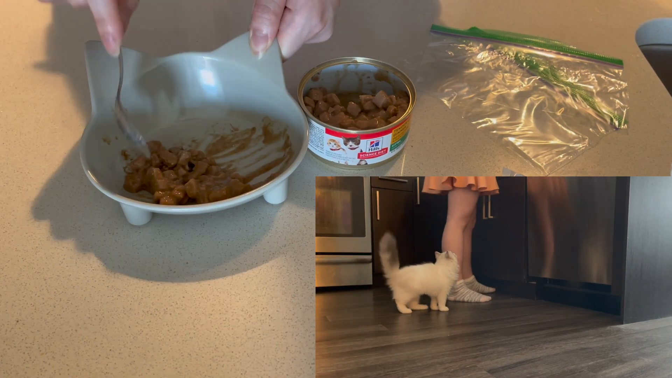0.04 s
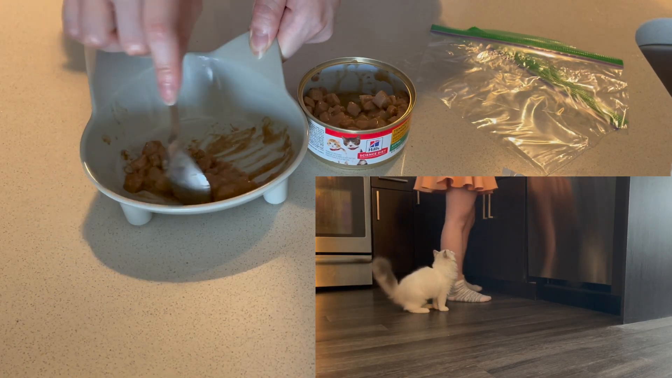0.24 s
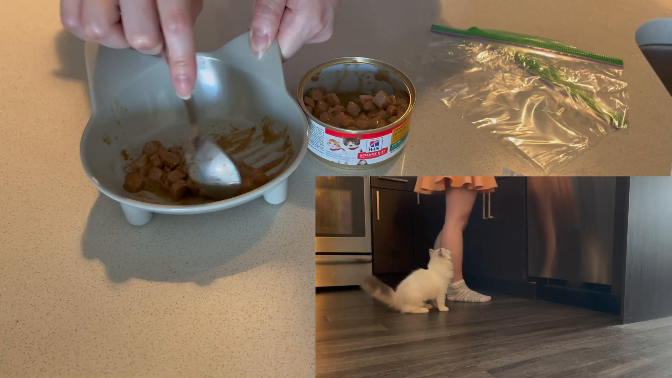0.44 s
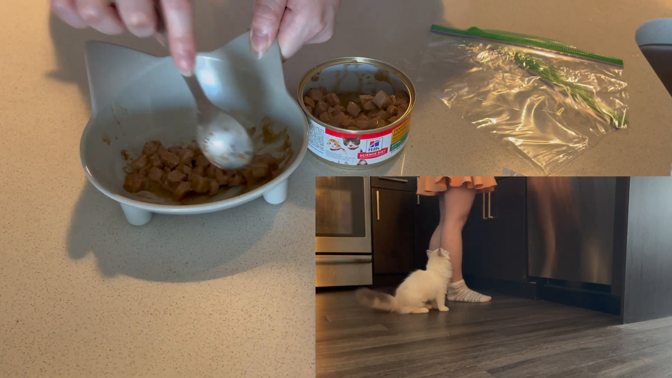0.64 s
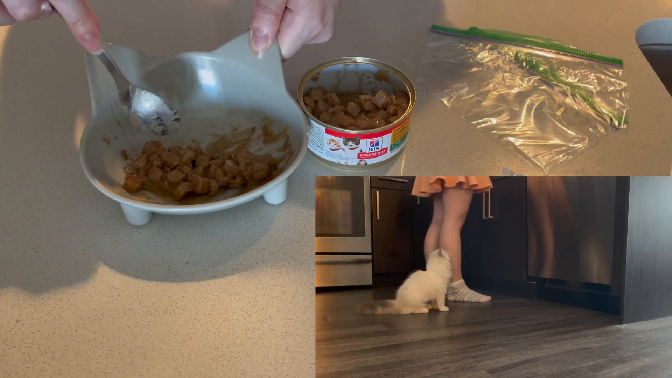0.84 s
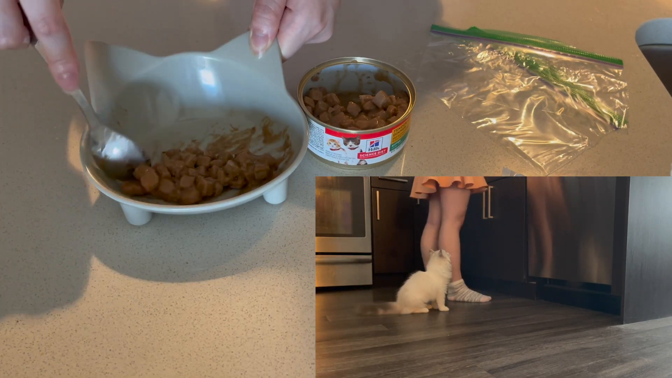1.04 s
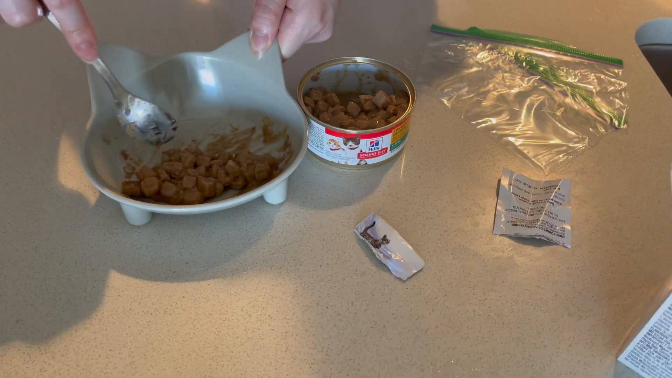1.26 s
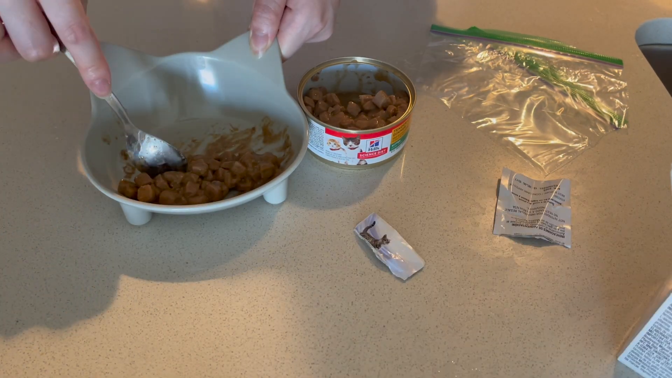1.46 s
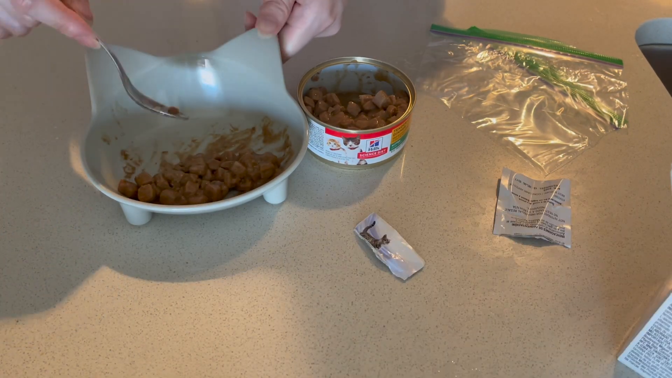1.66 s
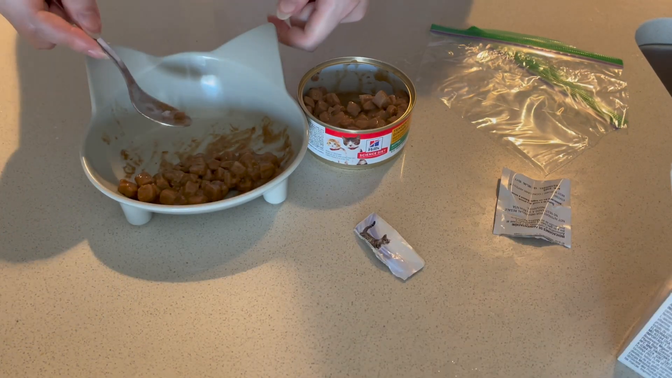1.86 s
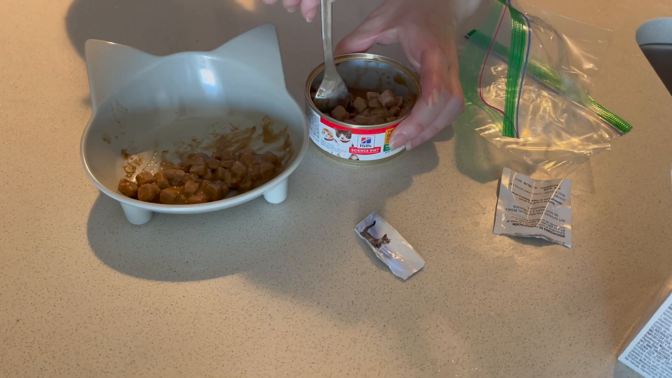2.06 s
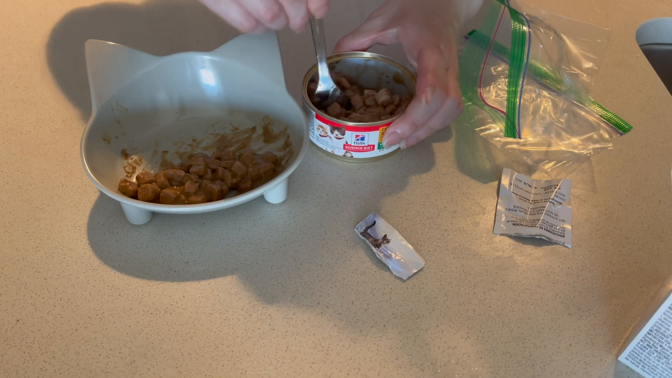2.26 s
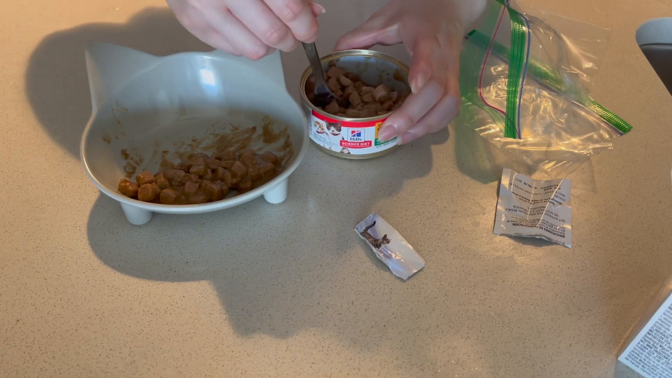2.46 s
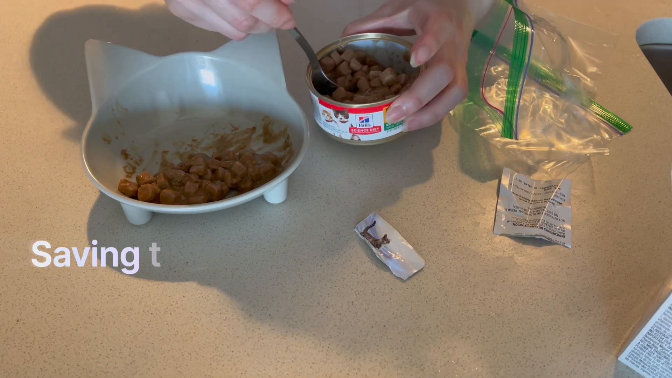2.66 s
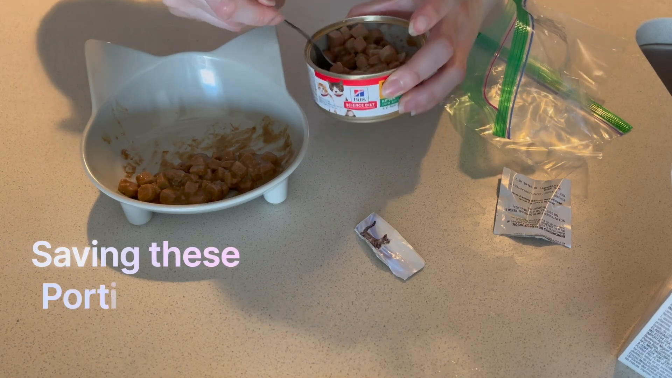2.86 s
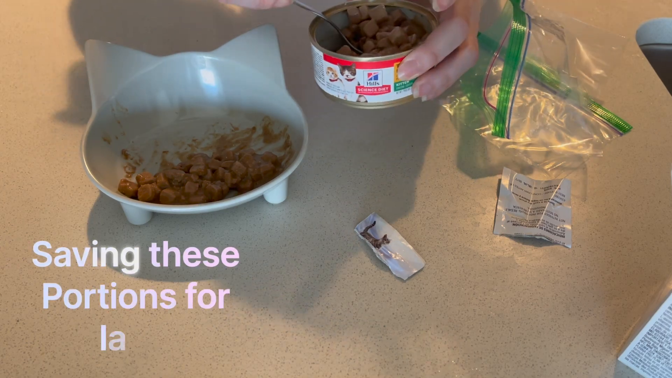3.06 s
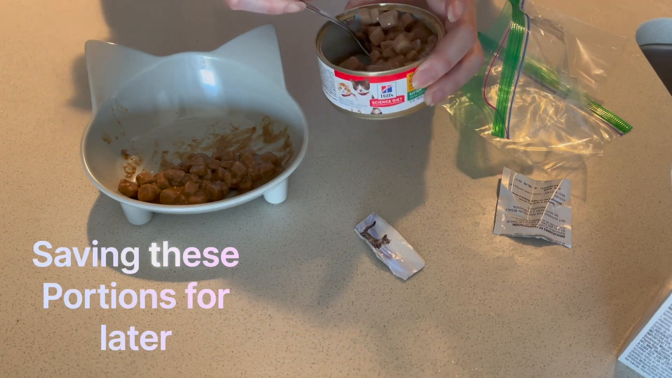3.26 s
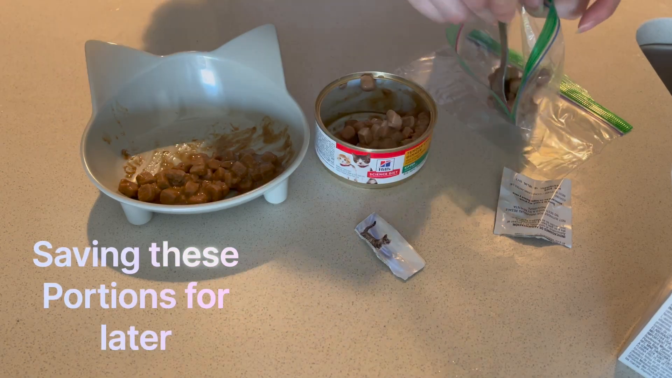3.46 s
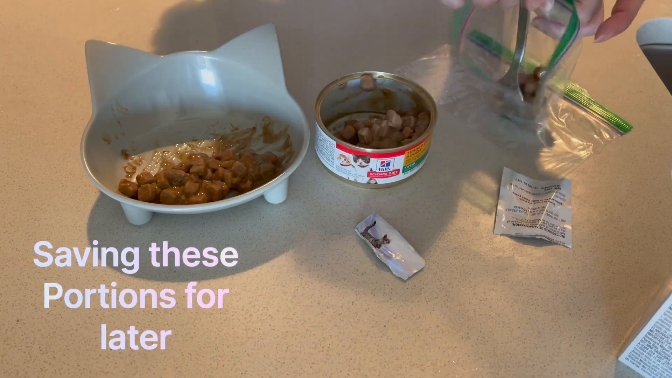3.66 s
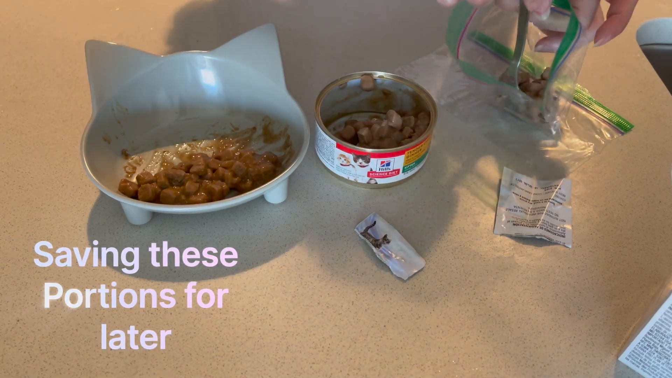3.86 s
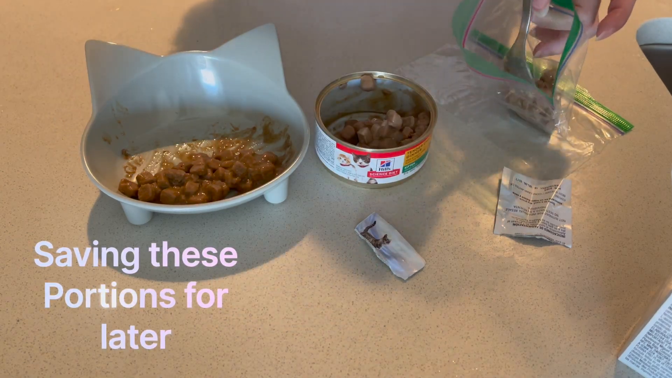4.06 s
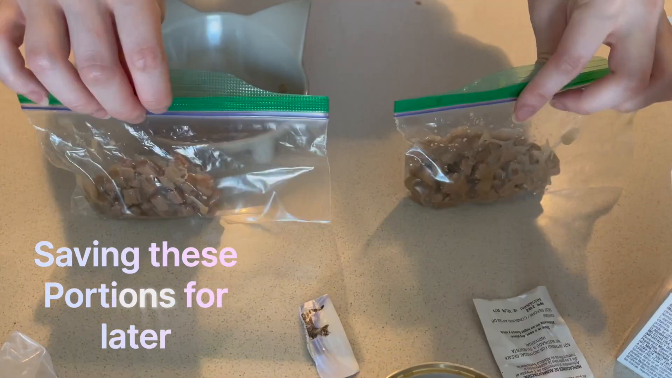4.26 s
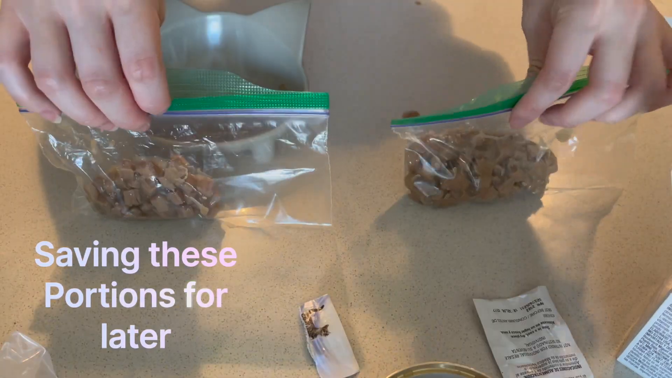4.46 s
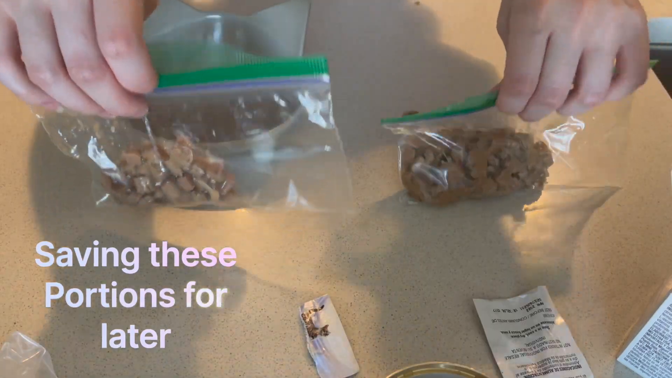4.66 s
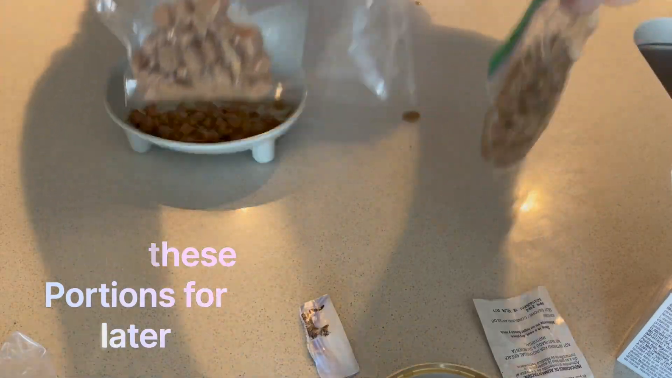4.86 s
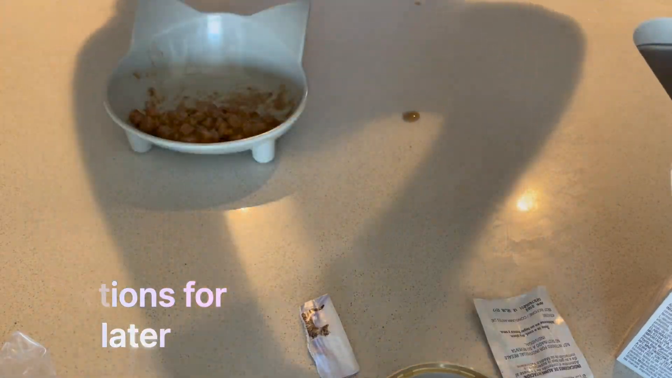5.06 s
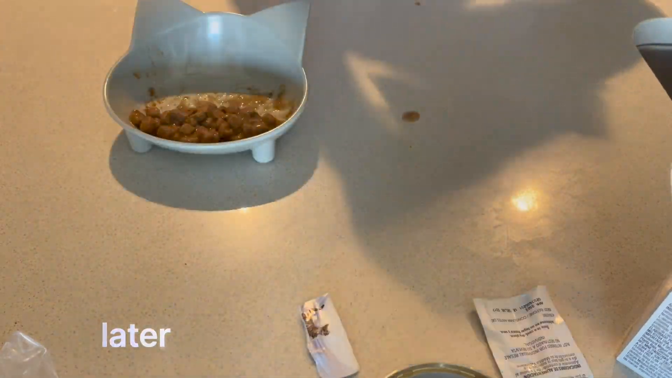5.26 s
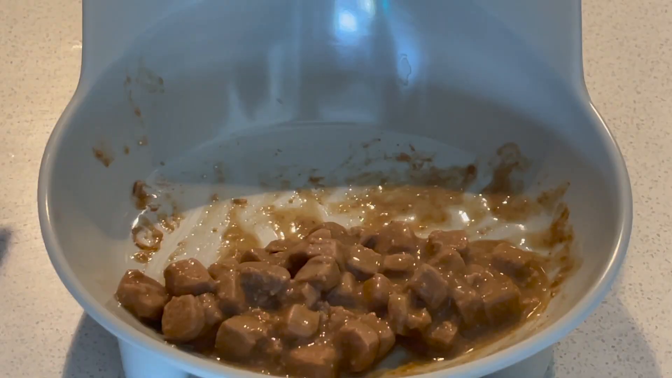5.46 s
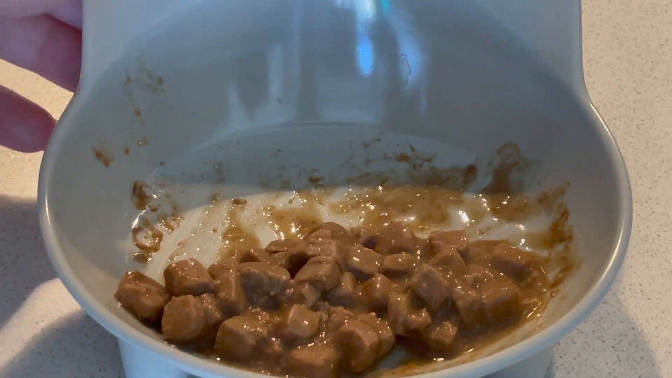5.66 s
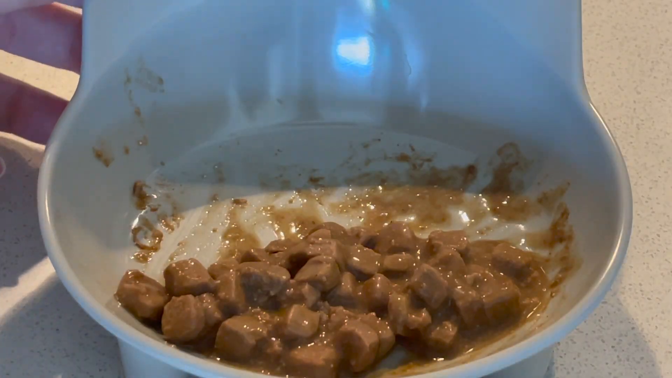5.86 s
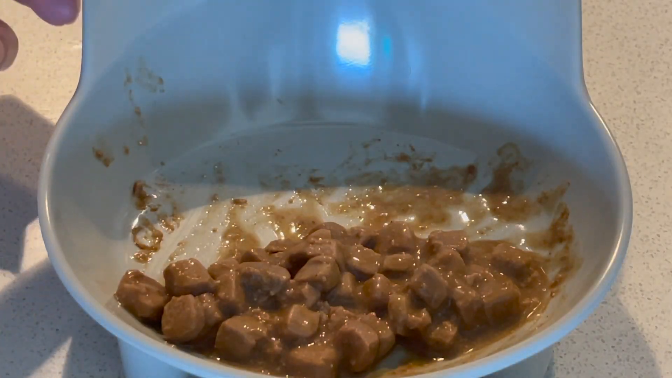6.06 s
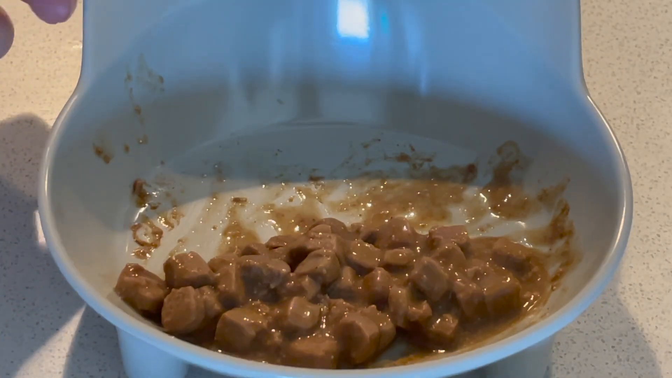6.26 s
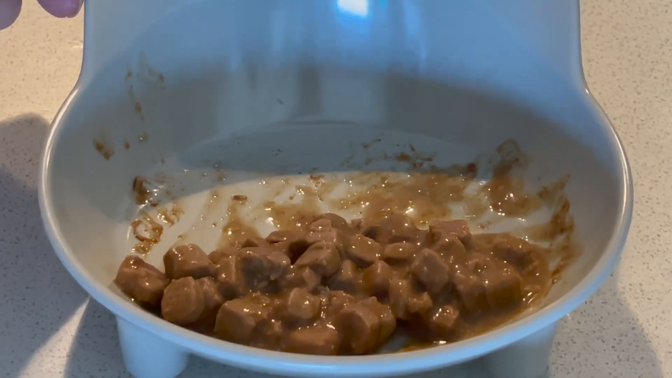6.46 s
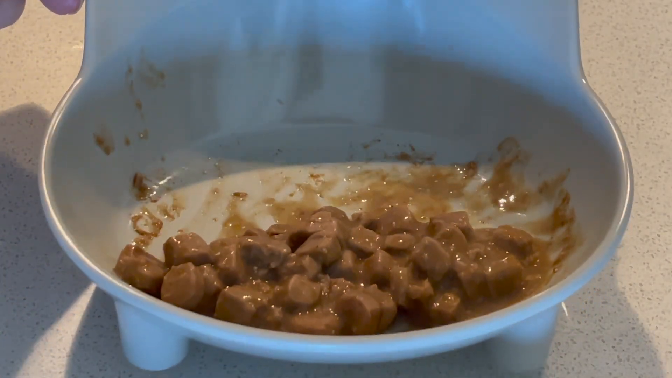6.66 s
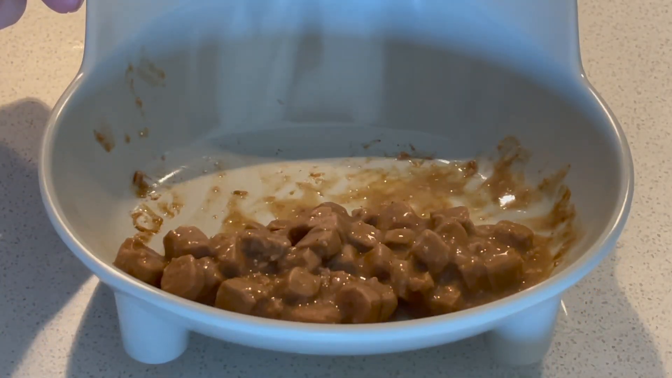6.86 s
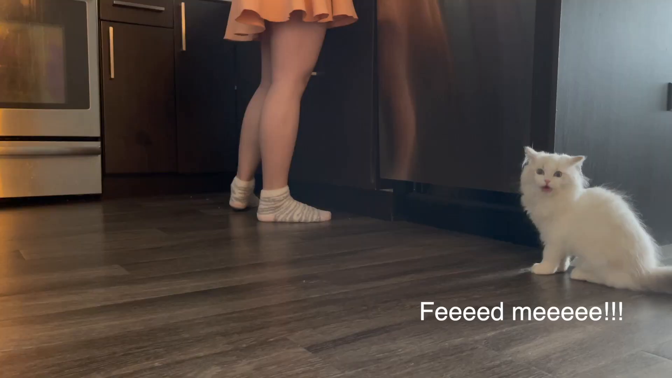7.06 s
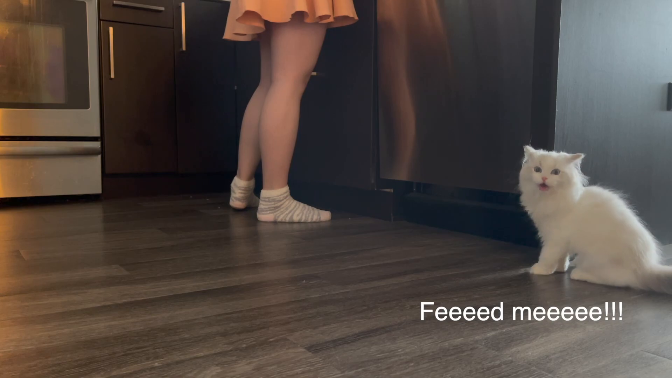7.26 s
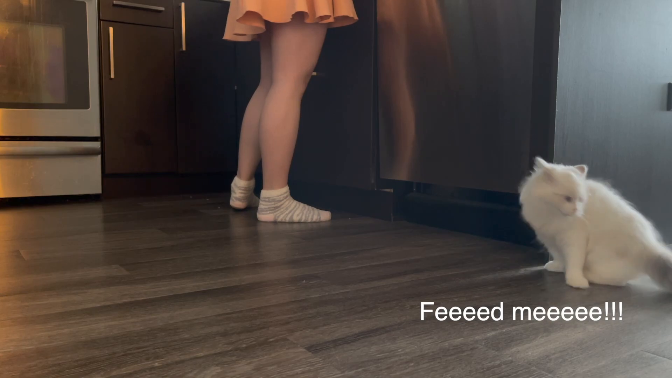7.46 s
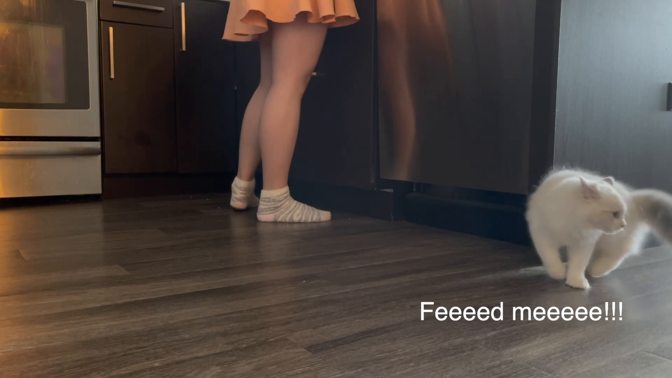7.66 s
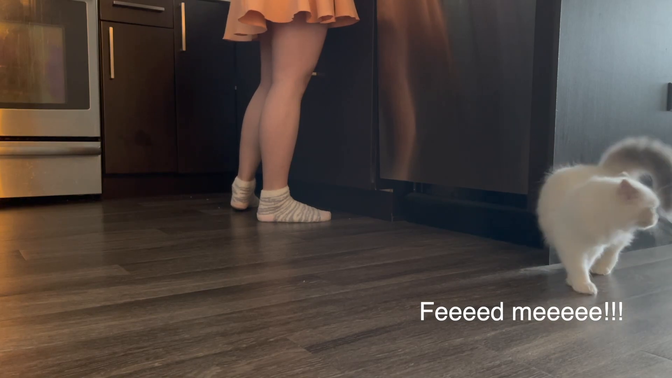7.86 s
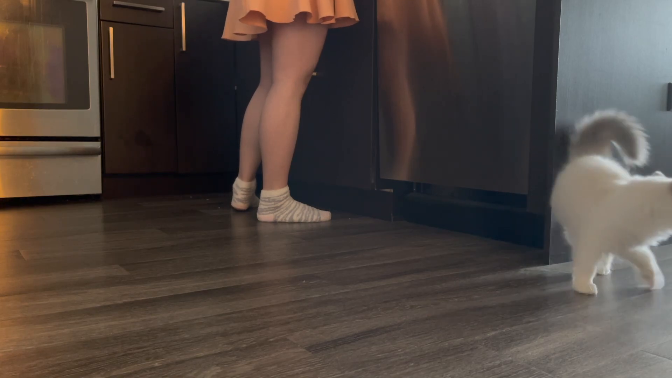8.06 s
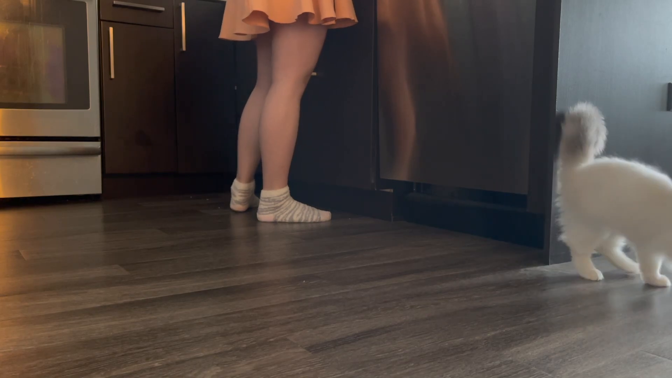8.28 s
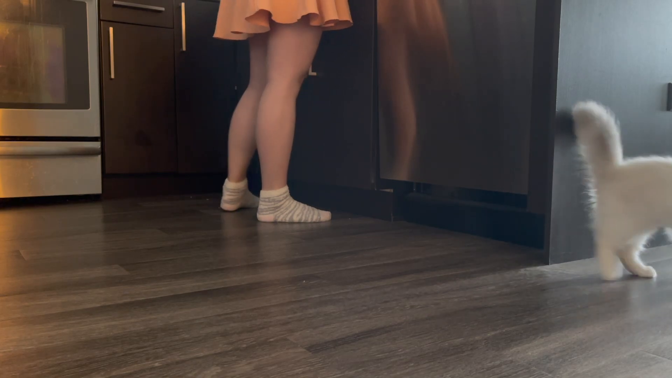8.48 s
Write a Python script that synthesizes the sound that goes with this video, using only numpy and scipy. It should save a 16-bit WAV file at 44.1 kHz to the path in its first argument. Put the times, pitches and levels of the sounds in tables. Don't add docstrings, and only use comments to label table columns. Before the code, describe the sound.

Spoon taps on a bowl, high kitten cries, then crackling plastic handled through three more meows, over a soft steady appliance fan.

```python
import sys
import numpy as np
from scipy import signal
from scipy.fft import rfft, irfft
from scipy.io import wavfile
from scipy.ndimage import uniform_filter1d, minimum_filter1d

SR = 44100
rng = np.random.default_rng(int(sys.argv[2]) if len(sys.argv) > 2 else 0)


def put_to_file(sound):
    columns = np.atleast_2d(sound).T
    safe = np.clip(columns, -1, 1)
    whole_steps = np.round(safe * 32767)
    wavfile.write(sys.argv[1], SR, whole_steps.astype(np.int16))


def boost_factor(decibels):
    exponent = np.asarray(decibels, float) / 20
    return 10 ** exponent


N = 375732

# frequency in Hz, level in dB per Hz.
FAN_AIR = [(15, -68), (34, -42), (52, -21), (120, -15.5), (170, -12), (202, 3.5), (250, -3), (320, -4),
           (650, -11), (800, -7.5), (1190, -20.5), (1560, -25), (2500, -43.5), (4500, -46), (7000, -39.5),
           (16000, -36)]
# frequency in Hz, width in Hz, level in dB.
MOTOR_LINES = [(43.5, 4.7, -59), (87, 5.6, -59.5), (187.4, 31, -49.5), (583, 5.2, -50), (1187, 9.7, -56)]
# frequency in Hz, time to fall 60 dB in seconds.
KITCHEN_DECAY = [(250, 0.33), (1000, 0.19), (2500, 0.49), (5000, 0.41), (9000, 0.33), (14000, 0.039)]

# frequency in Hz, level in dB per Hz.
FILM_COLOUR = [(1800, -2), (3000, 2), (4500, -1), (6700, -2.5), (8500, 0), (10000, -1.5), (11000, 7.5),
               (13000, -24), (16000, 0.5)]
# frequency in Hz, level in dB per Hz.
SCUFF_COLOUR = [(500, -52), (1000, 2), (1600, 1.5), (2500, 1), (3500, -8.5), (5000, -61), (7000, -50)]
# peak in seconds, rise in seconds, fall in seconds, film peak in dB, scuff relative to film in
# dB.
STROKES = [(0.01, 0.12, 1.2, -41, -15), (.2, 0.46, 1.6, -39.5, -8.5), (.942, 0.01, 0.29, -27, -13),
           (2.215, 0.1, 0.55, -40, -2.5), (2.95, 1.1, 0.65, -37, -3), (3.13, .03, 0.62, -43.5, -22),
           (3.262, .03, 0.18, -37.5, -9.5), (3.384, 0.044, 0.5, -38.5, -20), (3.54, 0.15, 0.16, -35, -13),
           (3.64, 0.041, 0.38, -33.5, -11), (3.75, .15, 0.087, -56, -15), (3.96, 0.032, 1.3, -43, -12),
           (4.1, 0.067, 0.67, -44, -8), (4.28, .2, .4, -59, -15), (4.44, 0.44, 0.15, -48.5, 7),
           (4.62, 0.87, 0.45, -28, -7), (4.85, 0.13, 0.53, -30.5, -15), (5.085, 0.047, 0.25, -25.5, -7),
           (5.14, 0.075, 0.18, -24.5, -6), (5.187, 0.062, 0.31, -27.5, -9), (5.408, 0.073, 0.48, -46.5, 11),
           (5.601, 0.16, 0.53, -32, -32), (5.743, 0.16, 0.15, -26, -6), (6.17, 0.62, 0.3, -30.5, -7.5),
           (6.55, 1.6, 0.42, -34, -8.5), (7.025, .015, .4, -50, 2), (6.797, 1.8, 0.13, -32.5, -12),
           (7.098, 0.11, 0.3, -28, 0), (7.33, 0.076, 0.48, -19.5, -10.5), (7.78, 1, 0.4, -39.5, -2.5),
           (7.965, 0.22, 0.28, -32.5, -3.5), (8.5, 6, 0.44, -48.5, -16)]
# start in seconds, peak in dB, centre in Hz, length in seconds.
SNAPS = [(1.95, -32, 8750, 0.024), (2.202, -24, 2900, 0.07), (3, -16, 10800, 0.033),
         (3.115, -9, 10300, 0.048), (3.26, -28, 8230, 0.036), (3.369, -17, 11500, 0.09),
         (3.636, -18, 8850, 0.025), (3.744, -25, 11400, 0.031), (3.949, -28, 3370, 0.11),
         (4.096, -22, 7800, 0.038), (4.349, -19, 6750, 0.082), (4.6, -9.5, 11200, 0.095),
         (4.813, -18, 11200, 0.034), (5.083, -17, 8200, 0.012), (5.135, -10, 8850, 0.04),
         (5.175, -10, 8200, 0.027), (5.079, -21, 2505, 0.03), (5.706, -23, 2600, 0.086),
         (7.913, -21, 8900, 0.037), (5.392, -20, 2930, 0.093), (5.599, -12, 9500, 0.028),
         (5.724, -10.5, 11800, 0.053), (5.948, -17, 10900, 0.012), (6.111, -9, 10400, 0.091),
         (6.343, -11, 12100, 0.034), (6.517, -9, 11600, 0.047), (6.596, -15, 10800, 0.07),
         (6.764, -23, 3430, 0.032), (7.016, -30, 11010, 0.021), (7.399, -10, 8720, 0.023),
         (7.406, -3.5, 11600, 0.046), (7.55, -15, 11000, 0.026), (7.763, -14, 10100, 0.033),
         (7.951, -21, 3200, 0.026)]
# start in seconds, peak in dB, centre in
# Hz.
TICKS = [(3.1149, -21, 9000), (3.2596, -28, 7500), (3.3718, -25, 9000), (3.385, -21, 11000),
         (3.478, -26, 9500), (3.4946, -28, 9500), (3.5699, -27, 10000), (3.5993, -29, 3900),
         (3.6327, -23, 4500), (3.754, -28, 11000), (3.7954, -25, 11500), (3.8303, -36, 10000),
         (3.8507, -36, 8000), (5.3972, -25, 3000), (5.5639, -29, 10000), (5.5988, -22, 7000),
         (5.946, -30, 10000), (2.13, -40, 3000), (3.935, -38, 9000), (3.975, -36, 11500),
         (3.984, -35, 11500), (4.0738, -32, 9000), (4.079, -32, 11500), (4.184, -36, 11500),
         (4.278, -37, 6000), (4.355, -28, 6500), (4.8176, -28, 3000), (4.8491, -27, 8600),
         (5.3823, -34, 2500), (5.8842, -33, 4000), (5.9316, -34, 7200), (7.0126, -38, 6000),
         (7.7679, -28, 9000), (7.8492, -33, 4000), (7.952, -29, 4000), (4.357, -28, 1500),
         (4.422, -31, 1500), (4.55, -29, 1500), (4.7, -31, 1600), (4.82, -29, 1500), (4.97, -33, 2500),
         (4.491, -29, 4000), (6.12, -27, 2000), (6.347, -28, 2500), (6.522, -28, 2300), (3.46, -33, 7000),
         (3.745, -31, 5000), (3.805, -33, 6000),
         (2.8363, -37, 4516), (2.92, -31, 5000), (3.0039, -28, 6000), (3.1205, -29, 8600),
          (3.1235, -28, 9600), (3.2655, -39, 7500), (3.4649, -37, 9000), (4.6076, -27, 7000),
          (5.0616, -30, 2500), (5.0786, -30, 5000), (5.0865, -26, 8000), (5.1339, -18, 4500),
          (5.1425, -25, 7000), (5.1803, -26, 7000), (5.1865, -20, 4500), (5.4487, -36, 2500),
          (5.5201, -35, 2500), (5.5699, -28, 11300), (5.626, -28, 8000), (5.6907, -29, 3000),
          (5.7191, -23, 3000), (5.742, -26, 5000), (6.5946, -27, 7000), (6.7323, -43, 6990),
          (7.3875, -16, 10900), (7.4195, -22, 11000), (7.5507, -32, 8500), (7.585, -33, 7000)]

# start in seconds, peak in dB, brightness in dB, main ring in Hz, contact in seconds.
CLINKS = [(0.1762, -8, 17.5, 1490, 0.0037), (0.486, -9, 15.5, 1485, 0.0038), (.935, 0.5, 26, 5800, 0.0061),
          (1.0641, -12, 18.5, 2700, 0.0049), (1.2301, -4, -4, 1880, 0.0071),
          (1.236, -9.5, -14, 2670, 0.0081), (2.75, -12.5, 36, 6260, 0.0026),
          (3.6865, -12, 19.5, 3260, 0.0062), (3.6885, -23, -25, 780, 0.0031),
          (5.222, -28.5, -28, 546, 0.016), (6.733, -22.5, -27, 665, 0.011), (7.075, -19, -4, 1870, 0.0076),
          (7.3074, -3.5, 36, 5500, 0.0067), (7.3124, -0.5, 19.5, 2570, 0.01), (7.313, -26, -29, 360, 0.004),
          (7.313, -10.5, -10, 3720, 0.016), (1.258, -23, -28, 1500, 0.011), (7.451, -11, 9, 1170, 0.0061)]
# frequency in Hz, width in Hz, level in dB.
BOWL_RINGS = [(1720, 60, 2), (2110, 200, -4), (2400, 200, -5), (2760, 220, -2), (3100, 300, -9),
              (4730, 250, -11), (5950, 300, -15)]

# time in seconds, pitch in Hz, effort in dB,
# chest tone relative in dB, open-mouth ring relative in dB.
MEOWS = [
    [(0.215, 895, -50, 0, -9), (0.24, 885, -36.5, 0, 8), (0.335, 871, -35, -9.5, 8.5),
     (0.493, 857, -32.5, -7.5, 7), (0.68, 860, -30, -11, -5), (0.77, 865, -33, -8, -4),
     (0.853, 849, -36, 4, -11), (0.945, 840, -43, 17.5, -18)],
    [(2.2, 906, -43.5, -5, 5.5), (2.288, 872, -37, 0, 4), (2.4, 896, -34, -6.5, 8.5),
     (2.49, 905.6, -35, -4.5, 0.5), (2.61, 894.4, -28, -14, -10), (2.768, 897, -29.5, -5.5, -11.5),
     (2.87, 875, -32, 5, -17), (3.0, 798, -53, 16, 2)],
    [(4.35, 930, -39.5, -9, 2), (4.406, 880.6, -34.5, -2, 6.5), (4.502, 865.7, -31, -6, 3.5),
     (4.69, 888.3, -30, -4.5, -7.5), (4.84, 861, -32, -2.5, -31), (4.95, 840, -45, 10.5, -13),
     (5.062, 809, -39, 13, -19), (5.24, 776, -50, 3, -21)],
    [(6.025, 908, -38, 2, -3), (6.065, 904, -31, -0.5, -1), (6.201, 893.4, -25.5, -2.5, -10.5),
     (6.289, 876, -38.5, 4, 4), (6.4, 873.4, -41.5, 5.5, 3.5), (6.53, 864.5, -38, 8, 0.5),
     (6.657, 844.4, -40, 11.5, -19), (6.742, 810.6, -38, 9, -18)],
    [(7.062, 931, -33, 0, 4), (7.11, 849, -35.5, 5, 6.5), (7.19, 830, -32.5, -0.5, 11),
     (7.28, 854, -34.5, 3, 5), (7.35, 835, -33.5, 0, 0), (7.43, 852, -35.5, 2.5, -5),
     (7.505, 877.5, -41, 9.5, -12), (7.64, 866, -51.5, 14, -22)],
]
# time in seconds, pitch in Hz, effort in dB, chest tone relative in dB, open-mouth ring relative in dB.
SQUEAKS = [
    [(2.175, 958, -59, 8.4, 13), (2.205, 982, -51, 11, 12), (2.232, 1000, -56, 23, -4)],
    [(4.305, 1020, -53.5, -6, -9), (4.34, 1026, -42, 2, 1), (4.362, 1125, -38, 3, -10)],
    [(5.975, 1030, -46, 4.5, -7), (6.015, 1040, -41, 5.4, -3), (6.045, 1080, -57, 10, 5)],
    [(7.046, 1076, -60, 14, 0), (7.07, 970, -34, 9.8, 0)],
    [(.9, 818, -47, 21, -16), (.935, 805, -58, 16, -20)],
    [(2.935, 833.3, -36, 16.7, -20), (2.98, 820, -55, 13, -20)],
    [(5.195, 816, -42, 24, -20), (5.232, 830, -65, 9.6, -20)],
    [(6.69, 811, -37.5, 9.6, -20), (6.728, 793, -47, 15, -20)],
    [(.195, 958, -51, 7.2, -1), (.225, 880, -45, 7.3, 1)],
]
# sharpness of the nasal resonances in dB,
# 4th partial against the 3rd in dB, 5th likewise in dB, nasal whistle in dB, whistle peak as 0-1 of the call.
VOICES = [(4, -33, -26, -53.5, 0.52), (6.5, -21, -26.5, -51.5, 0.55), (9, -23.5, -34, -57, 0.54),
          (8, -21.5, -33, -62, 0.4), (6, -21.5, -26.5, -56, 0.03), (-2, -29, -27, -64.5, 0.7),
          (-12, -30, -16, -69, 0.8), (-7, -30, -26, -62.5, 0.45),
          (-11, -12, -26, -68, 0.0)] + 5 * [(-2, -18, -25, -76, .5)]
# frequency in Hz, level in dB.
HEAD_COLOUR = [(3400, -10), (4400, -0.5), (5300, 1), (6200, -2), (7100, 4.5), (8000, 13), (8800, 5),
               (9600, 4), (11500, 3), (13000, -17)]
# frequency in Hz, half width in Hz.
NOSE = [
    (8900, 430),
    (11350, 150),
]
# time in seconds, number of the partial, half length in seconds.
DROPOUTS = [(.72, 1, .012), (.72, 2, .012), (2.43, 1, .025), (2.6, 1, .02), (2.925, 1, .012),
            (2.925, 2, .012), (4.42, 2, .008), (4.58, 2, .02), (4.705, 2, .01), (4.94, 1, .014),
            (5.19, 1, .01), (6.66, 2, .015), (6.685, 1, .008), (7.312, 1, .006), (6.64, 3, .05),
            (4.8, 3, .05), (7.545, 1, .012), (7.6, 1, .008), (7.194, 3, .005), (7.265, 3, .012),
            (7.14, 3, .02), (7.225, 3, .01)]

# frequency in Hz, likeness 0-1.
LIKENESS = [(40, 1), (170, .92), (500, .55), (1000, .2), (2000, .5), (6000, .55), (7600, .7), (8300, .88),
            (16000, .85)]
# frequency in Hz, lead in half turns.
PORT_LEAD = [(0, 0), (500, .07), (900, .28), (2000, .05), (3300, .3), (5900, .15), (6700, 0), (7600, .33),
             (8300, 0), (8700, 0), (10150, -1), (12200, -2), (13500, -3), (15000, -4)]
# frequency in Hz, left minus right in dB.
PORT_LEAN = [(60, 0), (200, 1), (700, 1), (1300, .5), (2500, 2), (6700, 4), (8200, 0), (16000, 0)]
# frequency in Hz, level in dB.
MICROPHONE = [(11300, -1.5), (11800, -1.5), (12200, -14), (12750, -11), (13500, -23), (14500, -30),
              (15800, -27), (16500, -73)]
OPEN_TREBLE = [2.75, 3.12, 3.27, 3.5, 3.81, 5.41, 5.73, 5.88, 6.13, 6.36, 7.11]


def evened(x):
    return x / np.sqrt(np.mean(x ** 2) + 1e-20)


def read(points, hz):
    f, value = np.transpose(points)
    return np.interp(np.log(hz + 1), np.log(f + 1), value)


def add(mix, s, sound):
    part = mix[round(s * SR):][:len(sound)]
    part += sound[:len(part)]


def coloured(x, spectrum):
    hz = np.fft.rfftfreq(x.shape[-1], 1 / SR)
    return evened(irfft(rfft(x) * boost_factor(read(spectrum, hz)), x.shape[-1]))


def resonate(x, hz, width):
    r = np.exp(-np.pi * width / SR)
    return signal.lfilter([1 - r, 0, r - 1], [1, -2 * r * np.cos(2 * np.pi * hz / SR), r * r], x)


def drift(length, samples):
    size = int(samples)
    once = uniform_filter1d(rng.standard_normal(length), size)
    return evened(uniform_filter1d(once, size))


def fan():
    sound = coloured(rng.standard_normal((2, N)), FAN_AIR) * boost_factor(-38 + 1.37 * drift(N, 1530))
    for hz, width, db in MOTOR_LINES:
        sound = sound + boost_factor(db) * evened(resonate(rng.standard_normal((2, N)), hz, width))
    return sound


def kitchen(x):
    taps = np.zeros((2, SR // 2))
    at = np.arange(200, SR // 2 - 20, 20) + rng.integers(0, 20, (2, (SR // 2 - 201) // 20))
    np.put_along_axis(taps, at, rng.choice([-1., 1.], at.shape), 1)
    hz, t, z = signal.stft(taps, SR, nperseg=256)
    t60 = np.maximum(read(KITCHEN_DECAY, hz), .05)[:, None]
    tail = signal.istft(z * boost_factor(-60 * t / t60), SR, nperseg=256)[1]
    return signal.fftconvolve(x[None], tail / np.linalg.norm(tail[0]), axes=1)[:, :N]


def rustle():
    t = np.arange(0, N, 32) / SR
    s, rise, fall, peak_db, scuff_db = np.transpose(STROKES)[:, :, None]
    away = np.where(t < s, (s - t) / rise, (t - s) / fall)
    power = boost_factor(2 * (peak_db - 36 * away))

    def gain(stroke_power):
        idle = boost_factor(2 * -62)
        return np.interp(np.arange(N) / SR, t, np.sqrt(idle + stroke_power.sum(0)))

    clumps_db = 1.8 * drift(N, 120) + 1.6 * drift(N, 700)
    grains = rng.standard_normal((2, 2, N)) * boost_factor(2.0 * rng.exponential(1, (2, 2, N)) + clumps_db)
    film = coloured(grains[0], FILM_COLOUR)
    flips = (rng.random((6, N)) < 7 / SR) * boost_factor(20 + 3 * rng.standard_normal((6, N)))
    for flip, hz in zip(flips, np.geomspace(2500, 11500, 6)):
        film = film + resonate(flip, hz, .4 * hz)
    scuff = coloured(grains[1], SCUFF_COLOUR)
    return gain(power) * film + gain(power * boost_factor(2 * scuff_db)) * scuff


def snap(peak_db, hz, length):
    u = np.arange(6000) / SR / length
    tick_db = 3 * np.minimum(rng.exponential(1, len(u)), 4)
    ticks = rng.standard_normal(len(u)) * boost_factor(tick_db - 14 * u) * np.minimum(12 * u, 1)
    return boost_factor(peak_db - 12.5) * resonate(ticks, np.clip(hz, 2000, 12000), 2700)


def tick(peak_db, hz):
    bright = hz > 6900
    flip = np.zeros(200)
    flip[[1, 25, 60]] = 1, -.5, .3
    sound = resonate(resonate(flip, hz, .6 * hz), hz, 1.2 * hz)
    edge = .25 * bright * np.diff(flip, 2, prepend=0, append=0)
    return boost_factor(peak_db + 3 + 7 * bright) * (sound / abs(sound).max() - edge)


def clink(peak_db, bright_db, ring_hz, contact):
    t = np.arange(6000) / SR
    u = t / contact
    chatter = rng.standard_normal(len(t)) * np.minimum(t / 0.00038, 1) * boost_factor(-4 * u - 6.7 * u ** 10.0)
    bowl = sum(boost_factor(db) * evened(resonate(chatter, hz, w)) for hz, w, db in BOWL_RINGS) * (ring_hz > 1400)
    ring = evened(resonate(resonate(chatter, ring_hz, .3 * ring_hz), ring_hz, .6 * ring_hz))
    crack = evened(resonate(chatter, 13700, 41000))
    rim = evened(resonate(chatter, 1750, 34)) * (1400 < ring_hz < 2000)
    blow = boost_factor(-5.5) * bowl + boost_factor(-21 - bright_db) * rim + ring + boost_factor(bright_db - 12.5) * crack
    high_pass = signal.butter(6, .82 * min(ring_hz, 1700), "high", fs=SR, output="sos")
    blow = signal.sosfilt(high_pass, blow)
    return boost_factor(peak_db) * blow / abs(blow).max()


def meow(rows, nose_db, fourth_db, fifth_db, nasal_db, nasal_at):
    s, *columns = np.transpose(rows)
    t = np.arange(s[0], s[-1], 1 / SR)
    since, left = t - t[0], t[-1] - t
    hz, effort_db, chest_db, mouth_db = (np.interp(t, s, c) for c in columns)
    turns = np.cumsum(hz * (1 + 0.0045 * drift(len(t), 158))) / SR
    if len(rows) > 3:
        inside = np.minimum(since / 0.013, left / 0.031)
        effort_db = effort_db - 6.5 * np.clip(1 - inside, 0, 1)
    whistle_db = nasal_db - 54 * (since / (t[-1] - t[0]) - nasal_at) ** 2
    open_db = uniform_filter1d(effort_db + mouth_db, size=1500) + 14 * np.exp(-since / 0.079)
    levels = [effort_db + chest_db + 1, effort_db, effort_db + mouth_db, open_db + fourth_db, open_db + fifth_db]
    for at, partial, half in DROPOUTS:
        levels[partial - 1] = levels[partial - 1] - 14 * np.exp(-((t - at) / half) ** 2)
    flutter_db = [min(.8 + .25 * k, 2) * drift(len(t), 260) for k in range(15)]

    def wave(k):
        return np.cos(2 * np.pi * k * turns + k * k)

    low = 0
    for k, db in enumerate(levels):
        low = low + boost_factor(db + flutter_db[k]) * np.cos(2 * np.pi * (k + 1) * turns + k * k)
    breath = 1 + 0.12 * drift(len(t), 48)
    top = 0
    for k in range(4, 15):
        ring = sum(np.exp(-((k * hz - f) / w) ** 2) for f, w in NOSE)
        top_db = read(HEAD_COLOUR, k * hz) + nose_db * (2 * ring - 1) + 2 * flutter_db[k]
        top = top + boost_factor(top_db) * wave(k)
    fade = np.clip(np.minimum(since, left) / .008, 0, 1)
    return s[0], np.sqrt(2) * (low + boost_factor(whistle_db) * breath * top) * fade


def ports(direct, diffuse):
    hz = np.fft.rfftfreq(N, 1 / SR)
    same = np.clip(read(LIKENESS, hz), -1, 1)
    near, (a, b) = rfft(direct), rfft(diffuse)
    lead = np.interp(hz, *np.transpose(PORT_LEAD))
    turn = boost_factor(read(PORT_LEAN, hz) / 2) * np.exp(.5j * np.pi * lead)
    left = (near + a) * turn
    right = (near + same * a + np.sqrt(1 - same ** 2) * b) / turn
    return irfft(np.array([left, right]) * boost_factor(read(MICROPHONE, hz)), N)


def thrift(x, pair_db, top_db, mask_db):
    hz, _, z = signal.stft([x[0] + x[1], x[0] - x[1]], SR, "cosine", 2048, 1024)
    bands = z[:, :1024].reshape(2, 64, 16, -1)
    level = 10 * np.log10((abs(bands) ** 2).mean(2) + 1e-20)
    hz, blocks = hz[8::16, None], level.shape[-1]
    edge = uniform_filter1d(np.diff(np.pad(x[0], (0, 2048)), 2) ** 2, 64)
    sharp = (-minimum_filter1d(-edge, 1024) > 7.5 * uniform_filter1d(edge, 2048))[::1024][:blocks]
    pair_gap = pair_db * rng.uniform(.6, 1.8, blocks) + 14 * sharp
    partner = (hz > 8200) * (level < level[::-1] - pair_gap)
    middle = level.max(0)[24:34].mean(0)
    budget = np.maximum(middle - top_db * rng.uniform(0.98, 1.7, blocks), level.max((0, 1)) - 57)
    near_open = abs(np.arange(len(sharp))[:, None] * 1024 / SR - OPEN_TREBLE) < .018
    spare = (hz > 14200) * near_open.any(1)
    top = (hz > 11000) * (level < budget - 14 * sharp) * ~spare
    louder = np.maximum(np.roll(level, 2, 1), np.roll(level, 3, 1))
    masked = (hz > 1900) * (level < louder - mask_db)
    z[:, :1024] *= np.repeat((partner + top + masked == 0) * boost_factor(8 * spare), 16, axis=1)
    mid, side = signal.istft(z, SR, "cosine", 2048, 1024)[1][:, :N]
    return np.array([mid + side, mid - side]) / 2


def scene():
    film = rustle()
    snaps, spoon, spoon_echo, kitten = np.zeros((4, N))
    for s, *fold in SNAPS:
        add(snaps, s, snap(*fold))
    for s, *flip in TICKS:
        add(snaps, s, tick(*flip))
    for s, peak_db, bright_db, ring_hz, contact in CLINKS:
        sound = clink(peak_db, bright_db, ring_hz, contact)
        echo_db = -3 - 3.5 * ring_hz / 1000 + 0.71 * contact * 1000
        add(spoon, s, sound)
        add(spoon_echo, s, boost_factor(echo_db) * sound)
    for rows, voice in zip(MEOWS + SQUEAKS, VOICES):
        add(kitten, *meow(rows, *voice))
    echo = kitchen(boost_factor(-7.5) * kitten + spoon_echo + boost_factor(-9.5) * snaps + boost_factor(-14.5) * film[0])
    return ports(kitten + spoon + snaps, echo + film + fan())


def roll_off(x):
    return signal.sosfilt(signal.butter(12, 16810, fs=SR, output="sos"), x)


def record(dry):
    thin = thrift(dry, pair_db=7, top_db=16, mask_db=28)
    return roll_off(thin)


dry = scene()
out = record(dry)
put_to_file(out)
```